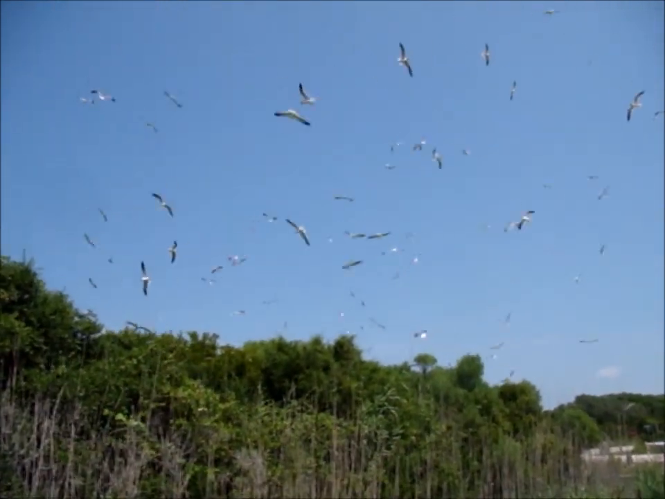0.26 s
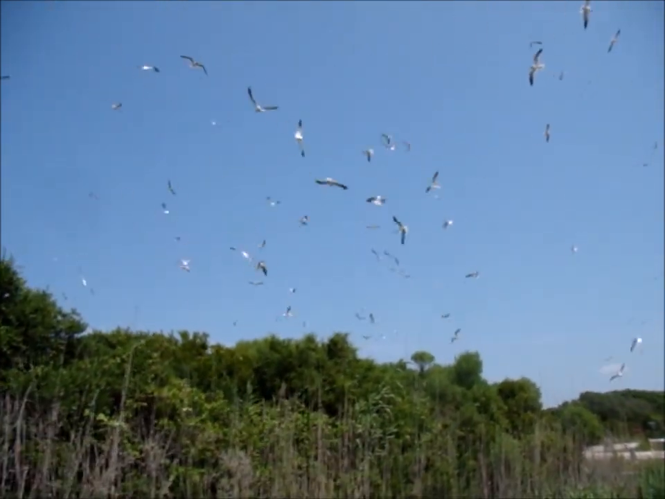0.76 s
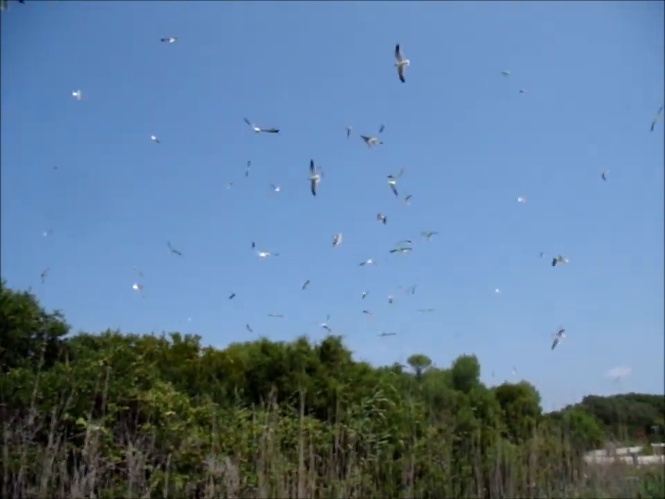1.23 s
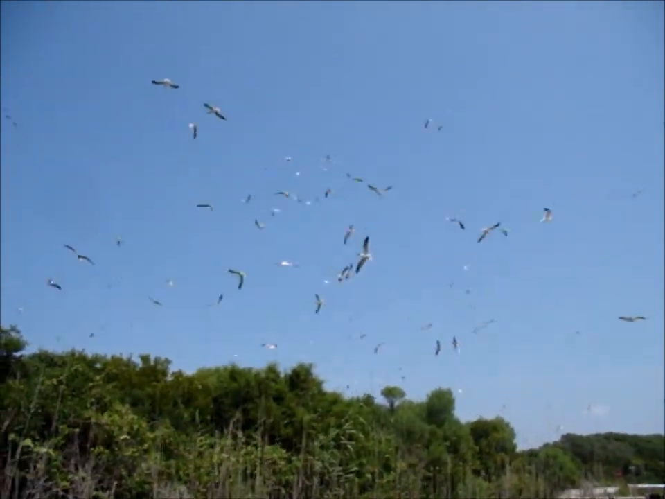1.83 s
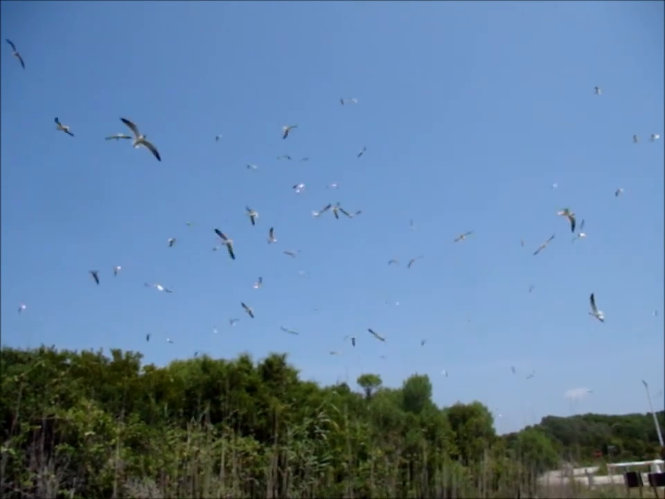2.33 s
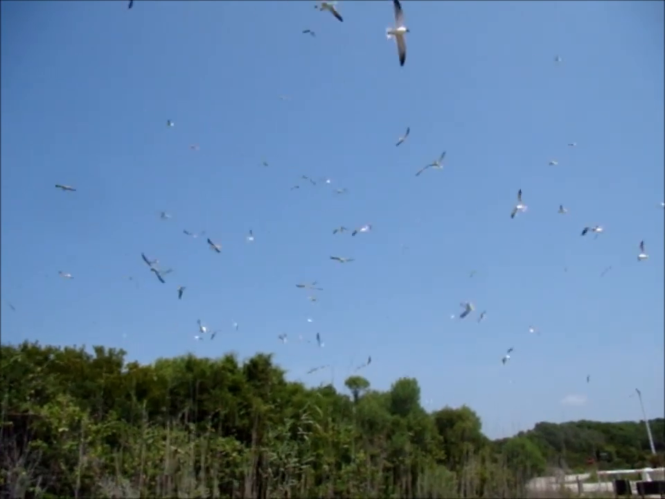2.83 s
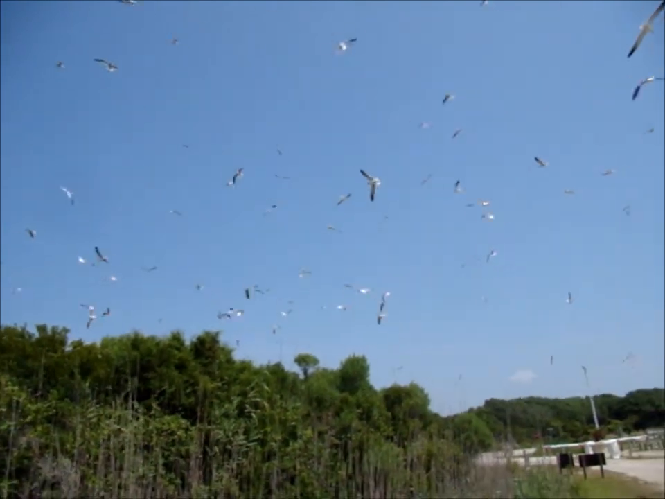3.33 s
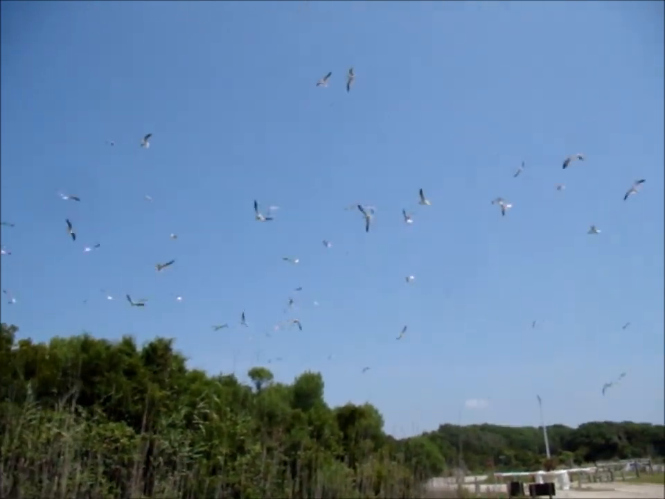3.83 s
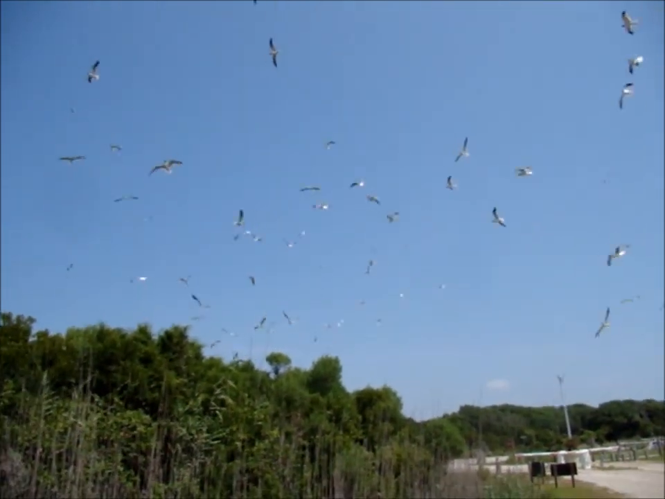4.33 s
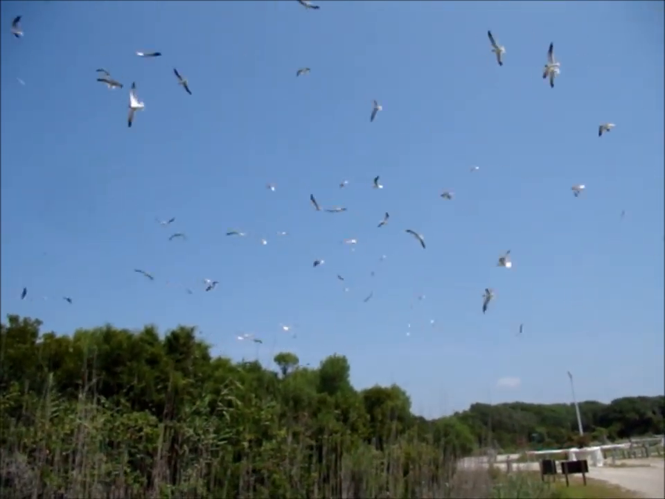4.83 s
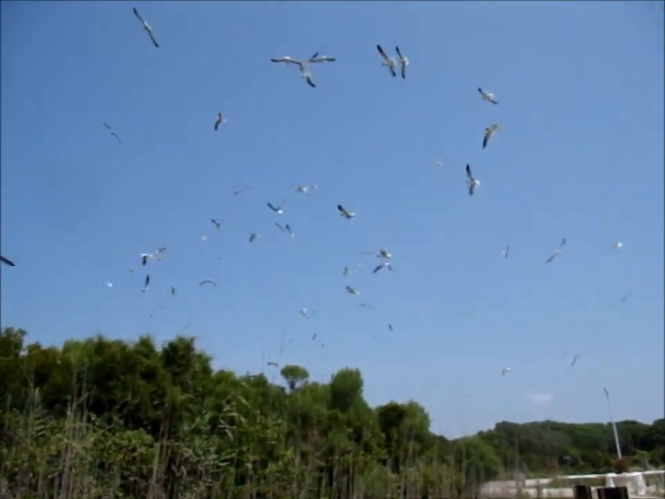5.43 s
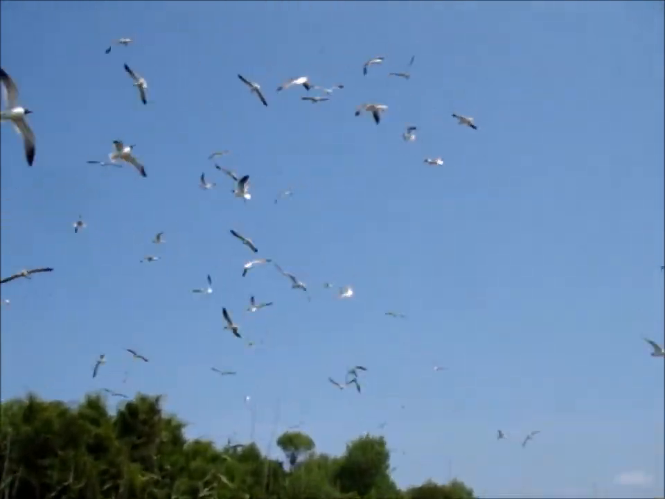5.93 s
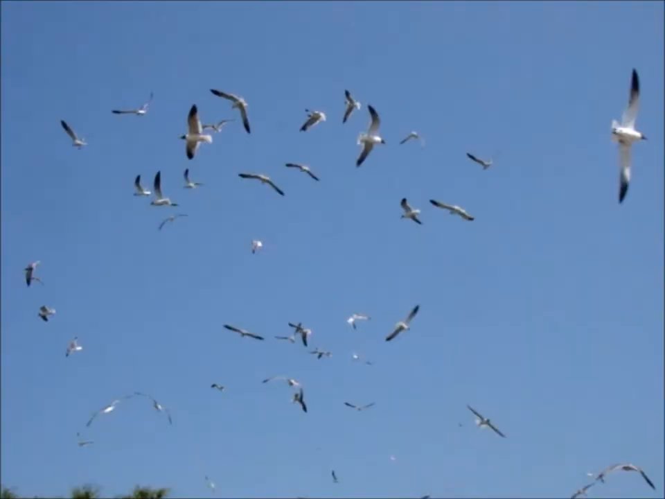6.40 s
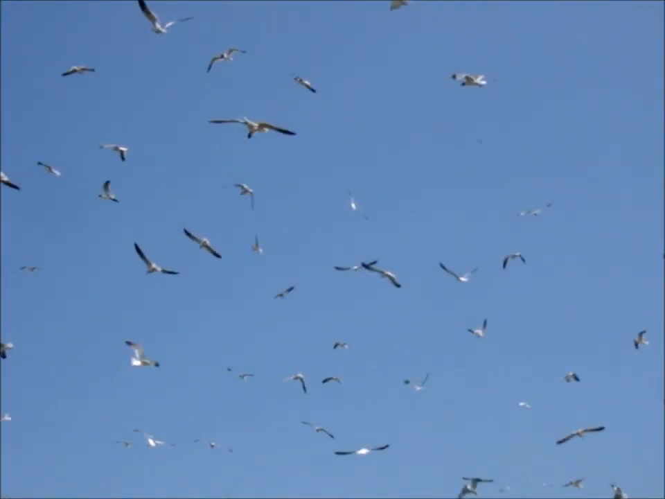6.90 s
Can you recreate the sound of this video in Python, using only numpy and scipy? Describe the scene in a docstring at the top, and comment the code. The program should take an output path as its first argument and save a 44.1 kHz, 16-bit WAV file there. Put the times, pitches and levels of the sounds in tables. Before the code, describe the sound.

A quiet, slightly wavering air rush runs throughout, with faint high insect chirps, a fading hiss and distant gull cries. At 0.14 s a small bird gives quick whistled pips and a soft trill until about 0.5 s. Near gulls then squawk in short, arched, nasal notes, with a longer cry at 0.9 s and a dense, loud, raspy tangle from 1.3 to 1.9 s. Soft low bumps fall at 0.8, 1.5 and 2.1 s. Three harsh cheks follow from 1.9 s. The flock thins; sharp hard clicks come at 2.4, 3.8 and 4.3 s. A thin insect shrill enters at 3 s, a pulsed buzz at 4.8 s, both ending near 6.3 s. Moderate gull calls gather from 3.5 s, loud ones burst at 5.2-5.5 s, and scattered squawks continue as the far flock swells until 7.1 s. Trees return a faint echo.

```python
"""Gulls over a marsh edge. From the start: filtered-noise air rush, far cries (harmonic sums), tree echoes
(delays and a noise tail), a narrow-noise insect chirper and a fading hiss. At 0.14 s sine pips and a trill;
from 0.3 s near gulls squawk over one another, pitch-gliding partials through throat and beak resonances.
Soft noise-puff bumps start at 0.8 s, harsh noise cheks at 1.9 s, sharp clicks (bursts ringing damped modes)
at 2.4 s; noise-band insects join: a shrill at 3 s, a pulsed buzz at 4.8 s."""
import sys
import numpy as np
from scipy import signal
from scipy.fft import rfft, irfft, next_fast_len
from scipy.io import wavfile
from scipy.ndimage import map_coordinates

SR = 44100
rng = np.random.default_rng(int(sys.argv[2]) if len(sys.argv) > 2 else 0)


def wav_record(signal):
    """Record a signal, one row per channel, as 16-bit PCM in the file named by sys.argv[1]."""
    frames = np.transpose(np.atleast_2d(signal))
    bounded = np.clip(frames, -1, 1)
    # unit amplitude maps onto the largest positive 16-bit level
    quanta = np.round(bounded * 32767).astype(np.int16)
    wavfile.write(sys.argv[1], SR, quanta)


N = 315756

# Gull throat response: f/Hz, level/dB
THROAT_RESPONSE = [(400, -27.5), (750, -11.5), (1050, -11), (1350, -7.5), (1900, -1.5), (2600, -2),
                   (3300, -4.5), (4050, -2), (4600, -9), (5250, -5), (5900, -13), (6600, -20.5),
                   (8500, -23), (11000, -55.5)]


def amp(db):
    """Decibels to gain."""
    return 10 ** (np.asarray(db) / 20)


def unit(x):
    """Scale to rms 1."""
    return x / np.sqrt(np.mean(x ** 2) + 1e-20)


def along(points, hz):
    """Interpolate (f/Hz, value) points on a log frequency axis."""
    f, v = np.transpose(points)
    return np.interp(np.log(hz + 1), np.log(f + 1), v)


def clock(size=N):
    """Time of each sample, s."""
    return np.arange(size) / SR


def level(rows):
    """Gain per sample from (t/s, level/dB) rows."""
    return amp(np.interp(clock(), *np.transpose(rows)))


def wobble(rate_hz, size=N):
    """Smooth random curve with rate_hz knots per second."""
    knots = rng.standard_normal(int(size * rate_hz / SR) + 4)
    return map_coordinates(knots, [clock(size) * rate_hz])


def filtered(x, response):
    """Apply a real gain response(f/Hz) by zero-padded FFT."""
    m = next_fast_len(N + SR // 2)
    return irfft(rfft(x, m) * response(np.fft.rfftfreq(m, 1 / SR)), m)[:N]


def noise(colour):
    """Noise of rms 1, spectrum from (f/Hz, level/dB) points."""
    return unit(filtered(rng.standard_normal(N), lambda hz: amp(along(colour, hz))))


def band(centre_hz, width_hz):
    """Noise of rms 1 in one steep resonance."""
    return unit(filtered(rng.standard_normal(N), lambda hz: 1 / (1 + ((hz - centre_hz) / width_hz) ** 4)))


def add(track, s, sound):
    """Mix a sound into the track at time s."""
    start = int(np.clip(round(s * SR), 0, N))
    track[start:start + len(sound)] += sound[:N - start]


def air(air_db=-41.5, swell_db=-48, swell_s=4.24, swell_length_s=1.0, sizzle_db=-55, sizzle_hz=7900):
    """Slightly wavering broadband rush and a high sizzle; the low middle swells once."""
    # Rush spectrum: f/Hz, density/dB per Hz
    rush_colour = [(15, -54), (25, -18), (135, -11), (207, -4.5), (917, 0), (1180, 1), (1560, -9),
                   (2000, -10), (2780, -14), (3320, -15.5), (4370, -12.5), (5090, -17.5), (5920, -15),
                   (9550, -8.5), (10300, -62), (13400, -59), (22000, -120)]
    swell_colour = [(120, -41), (230, -11), (450, 10.5), (1200, -14.5), (2000, -51.5)]  # f/Hz, level/dB
    rush = noise(rush_colour) * amp(air_db + wobble(3) / 4)
    sizzle = amp(sizzle_db) * band(sizzle_hz, 1100)
    swell = amp(swell_db) * np.exp(-((clock() - swell_s) / swell_length_s) ** 2)
    return rush + sizzle + swell * noise(swell_colour)


def spell(start_s, end_s, db, fade_s=0.2):
    """Gain of an insect that swells, holds and fades."""
    t = clock()
    return amp(db) * np.clip(np.minimum(t - start_s, end_s - t) / fade_s, 0, 1)


def insects(chirp_db=-55, hiss_db=-53, hiss_hz=5200, hiss_fade_s=4, chirp_rate_hz=6.3, buzz_rate_hz=73):
    """Narrow noise bands: fading hiss, gated high chirps, steady shrill, pulsed buzz."""
    # One spell each: start/s, end/s, level/dB
    shrill_spell = (2.98, 6.3, -50)
    buzz_spell = (4.8, 6.35, -46.5)
    t = clock()
    hiss = amp(hiss_db) * np.exp(-t / hiss_fade_s) * band(hiss_hz, 280)
    gate = np.maximum(np.cos(2 * np.pi * chirp_rate_hz * t + .5 * wobble(1.5)), 0)
    chirps = amp(chirp_db) * unit(band(9786, 190) * gate)
    shrill = band(9166, 140) * spell(*shrill_spell)
    beat = 2 * np.pi * buzz_rate_hz * t
    pulses = (1 + .8 * np.sin(beat)) * (1 + .3 * np.sin(beat / 3))
    buzz = unit(band(4060, 280) * pulses) * spell(*buzz_spell)
    return hiss + chirps + shrill + buzz


def note(length_s, rise_s, crest_hz, scoop, sag, drop, db, change_db):
    """Pitch and gain climb to a crest and fall at the close; long notes swing to a second, lower crest."""
    onset_db, release_db, edge_s = -8.5, -12, 0.0028
    two_crest_s = .172  # longer notes dip and lift again
    dip_share, swing_share, settle_share = .42, .35, .38  # of the time after the crest
    close_share, close_curve = .28, 1.7  # share of the whole note; how late the drop steepens
    t = clock(int(length_s * SR))
    opening = np.maximum(1 - t / rise_s, 0) ** 2
    held = np.maximum(t - rise_s, 0) / max(length_s - rise_s, edge_s)
    if length_s > two_crest_s:
        settled = 1 - np.exp(-(held / swing_share) ** 2) * np.cos(np.pi * held / dip_share)
    else:
        settled = 1 - np.exp(-(held / settle_share) ** 2)
    closing = np.maximum(1 - (1 - t / length_s) / close_share, 0) ** close_curve
    pitch = crest_hz * (1 - scoop * opening) * (1 - sag * settled) * (1 - drop * closing)
    ends = np.clip(np.minimum(t, length_s - t) / edge_s, 0, 1)
    gain = ends * amp(db + onset_db * opening + change_db * held + release_db * closing ** 2)
    return pitch, gain


def syrinx(pitch, rasp):
    """Phase and strength of the membranes; raspy ones turn hoarser where the pitch slides fast."""
    size = len(pitch)
    slide = abs(np.gradient(np.log(pitch))) * SR  # 1/s
    hoarse = np.sqrt(np.clip(rasp * (1 + .028 * slide ** 2), 0, .9))
    phase = 2 * np.pi * np.cumsum(pitch * (1 + .0055 * wobble(80, size))) / SR
    phase += .19 * hoarse * wobble(400, size)
    strength = amp(1.3 * wobble(70, size)) * (1 + .35 * hoarse * wobble(400, size))
    return phase, strength


def cry(pitch, gain, beak_hz, beak_db, treble_db, rasp, count=12, beak_width=0.19, beak_fall=0.099, drift_db=3):
    """The syrinx buzzes through throat and beak; the beak closes along the cry, and effort brightens it."""
    size = len(pitch)
    phase, strength = syrinx(pitch, rasp)
    k = np.arange(1, count + 1)[:, None]
    hz = k * pitch
    centre_hz = beak_hz * np.exp(beak_fall * np.linspace(1, -1, size))
    beak = beak_db * np.exp(-np.log(hz / centre_hz) ** 2 / (2 * beak_width ** 2))
    effort_db = 5 * np.log10(gain / gain.max() + .1)
    treble = (treble_db + effort_db) * np.clip(np.log2(hz / 2400), 0, 1)
    knots_s = np.arange(24) / 45
    drift = np.array([np.interp(clock(size), knots_s, row) for row in rng.standard_normal((count, 24))])
    flicker = drift_db * np.sqrt(k / 4) * drift  # strongest in the upper partials
    partials = amp(along(THROAT_RESPONSE, hz) + beak + treble + flicker)
    partials /= np.sqrt(np.sum(partials ** 2, axis=0) / 2)
    waves = np.sin(k * phase + .5 * k ** 2)  # the throat spreads each pulse in time
    return gain * strength * np.sum(partials * waves, axis=0)


def far_gulls(count=52, pitch_hz=780, length_s=0.27, treble_db=-9, rise_s=.06, scoop=.22, sag=.06, drop=0.18):
    """Many distant arched cries, dulled by the air, at random pitch, length and level."""
    # Level of the far flock: t/s, level/dB
    flock_level = [(0, -44.5), (.8, -45.5), (2, -58), (3.3, -72), (4.2, -64), (5.6, -57), (6.5, -49.5),
                   (7.1, -43.5)]
    out = np.zeros(N)
    for i, (when, high, long, loud) in enumerate(rng.uniform(-1, 1, (count, 4))):
        pitch, gain = note(length_s * np.exp(.4 * long), rise_s, pitch_hz * np.exp(.27 * high),
                           scoop, sag, drop, 3 * loud, -1)
        start_s = (i + when / 2) * N / SR / count
        add(out, start_s, cry(pitch, gain, beak_hz=1340, beak_db=0.5, treble_db=treble_db, rasp=0.37, count=6))
    return unit(out) * level(flock_level)


def trees(x, wet_db=-22, echo_db=-31, echo_s=0.19, ground_db=-20, ground_s=.007):
    """The ground answers almost at once, the tree line later; foliage scatters a decaying tail."""
    # Tail decay: f/Hz, t60/s
    decay = [(300, 0.17), (2000, 0.9), (5000, 0.64), (10000, 0.034)]
    hz, t, z = signal.stft(rng.standard_normal(SR * 3 // 4), SR, nperseg=256)
    tail = signal.istft(z * amp(-60 * t / along(decay, hz)[:, None]), SR, nperseg=256)[1]
    scatter = signal.fftconvolve(x, tail / np.linalg.norm(tail))[:N]
    late = lambda s: np.pad(x, (int(s * SR), 0))[:N]
    return amp(wet_db) * scatter + amp(echo_db) * late(echo_s) + amp(ground_db) * late(ground_s)


def small_birds(trill_rate_hz=41, trill_hz=2720, upper_hz=3190, trill_db=-39, upper_db=-4, droop_hz=35):
    """Gliding sine pips, a quick trill of two alternating sine voices, and harsh noise cheks."""
    # Whistled pips: start/s, length/s, first pitch/Hz, last pitch/Hz, level/dB
    pips = [(.142, 0.012, 2220, 2380, -30), (0.159, 0.048, 3300, 3436, -30),
            (0.203, 0.049, 2600, 2060, -34)]
    # Harsh notes: t/s, level/dB
    cheks = [(1.908, -29), (2.037, -30.5), (2.196, -32), (3.955, -39)]
    # Chek spectrum: f/Hz, level/dB
    chek_colour = [(1500, -24.5), (2700, -15), (3500, -4), (4200, -6.5), (5200, -27), (9000, -41)]
    out, t = np.zeros(N), clock()
    whistle = lambda pitch: np.sqrt(2) * np.sin(2 * np.pi * np.cumsum(pitch) / SR)
    for s, length_s, first_hz, last_hz, db in pips:
        size = int(length_s * SR)
        add(out, s, amp(db) * np.hanning(size) * whistle(np.linspace(first_hz, last_hz, size)))
    beat = 2 * np.pi * trill_rate_hz * t + 0.56 * wobble(8.5)
    trill_fade = np.interp(t, [.19, .24, .45, .49], [0, 1, 1, 0])
    for hz, db, turn in [(trill_hz, 0, 0), (upper_hz, upper_db, np.pi)]:  # upper voice half a beat away
        gate = np.clip(.5 + np.cos(beat + turn), 0, 1) * trill_fade
        pitch = hz - droop_hz * np.sin(beat + turn) + 18 * wobble(340)
        out += amp(trill_db + db) * gate * whistle(pitch)
    harsh = noise(chek_colour)
    for s, db in cheks:
        u = np.maximum(t - s, 0) / 0.014  # peaks 14 ms after its start
        out += amp(db) * u * np.exp(1 - u) * harsh
    return out


def near_gulls(rush_db=-12):
    """Overlapping near cries; air rushing through a raspy throat hisses between the partials."""
    # Notes: start/s, length/s, rise to crest/s, crest pitch/Hz, opening scoop/0-1, sag after crest/0-1,
    # closing drop/0-1, crest level/dB, change to end/dB, mid-cry beak resonance/Hz, its height/dB,
    # treble/dB, rasp/0-1
    gull_notes = [(0.32, 0.096, 0.039, 970, 0.4, 0, 0.3, -42.5, -1, 2111, 10, 7, 0),
                  (0.469, 0.087, 0.022, 1060, 0.3, 0.12, 0.18, -27, -1, 2550, 5.5, 0.5, 0.28),
                  (0.557, 0.14, 0.029, 883, 0.2, 0.01, 0.15, -30, -1.5, 2500, 5.5, 0.5, 0.22),
                  (0.6, 0.13, 0.033, 723, 0.14, 0.13, 0.22, -35.5, 6.5, 1960, 8.5, -4, 0.7),
                  (0.713, 0.11, 0.033, 628, 0.19, 0.05, 0, -31, -10, 1690, 3.5, -9, 1),
                  (0.768, 0.095, 0.056, 876, 0.5, 0.1, 0.54, -37, 0.5, 1540, 12, -14, 0.9),
                  (0.919, 0.25, 0.045, 725.3, 0.24, 0.095, 0.11, -23, -0.5, 2260, 9, -2, 0.17),
                  (0.957, 0.07, 0.0162, 1067, 0.15, 0.12, 0.1, -34, -2, 4100, 9, -3, 0.2),
                  (1.027, 0.15, 0.065, 999, 0.33, 0, 0.24, -28, -13, 4000, 6, -4, 0),
                  (1.334, 0.077, 0.043, 901, 0.27, 0.01, 0, -25, -18, 2590, 11, -2, 0.2),
                  (1.375, 0.04, 0.02, 990, 0.27, 0.02, 0.06, -28, -3, 3520, 3, -9, 0),
                  (1.402, 0.076, 0.069, 870, 0.08, 0.1, 0.02, -33, -0.5, 1750, 4.5, -2, 0.1),
                  (1.468, 0.083, 0.039, 1027, 0.2, 0.08, 0.16, -26.5, -2, 2592, 4, -2, 0.1),
                  (1.547, 0.057, 0.025, 787, 0.04, 0.06, 0.37, -29, 3, 2500, 11, 2.5, 0),
                  (1.56, 0.048, 0.023, 968, 0.01, 0.07, 0.03, -35.5, 8.0, 3279, 14, -3, 0.2),
                  (1.598, 0.059, 0.012, 822, 0.26, 0.07, 0.14, -26, -2, 2410, 15, 0, 0.3),
                  (1.645, 0.058, 0.015, 754, 0.12, 0.01, 0.2, -25.5, 2, 2300, 11, -3, 0.6),
                  (1.666, 0.086, 0.035, 1084, 0.4, 0.09, 0.11, -17.5, -10, 4070, 4, -2, 0.3),
                  (1.669, 0.092, 0.025, 959, 0.3, 0.08, 0.3, -25, -4, 1770, 5.5, -3, 0.8),
                  (1.748, 0.168, 0.0096, 791, 0.32, 0.11, 0.42, -29, 0.5, 1960, 9.5, -1.5, 0.23),
                  (1.762, 0.086, 0.013, 882, 0.13, 0.01, 0.02, -24, 1.5, 5000, -5.5, 12.5, 0),
                  (1.82, 0.092, 0.042, 978, 0.13, 0.05, 0.3, -21, -6.5, 3160, 2, 4.5, 0.1),
                  (1.95, 0.13, 0.03, 965, 0.02, 0, 0.36, -40.5, -4, 1384, 18, 0, 0.02),
                  (2.534, 0.1, 0.056, 715, 0.25, 0, 0, -39.5, 2, 2811, 13, -13, 0.4),
                  (2.61, 0.14, 0.05, 750, 0.02, 0.08, 0.32, -35.5, 1, 2660, 13, -12, 0.2),
                  (2.726, 0.13, 0.02, 600, 0.2, 0.06, 0.2, -44, -6.5, 1770, 8, -6, 0.9),
                  (2.944, 0.086, 0.046, 739, 0.06, 0.02, 0, -43.5, -2, 2160, 13, -35, 0.2),
                  (3.009, 0.12, 0.046, 721, 0.28, 0.12, 0.12, -37, -7, 1220, 20, -31, 0),
                  (3.517, 0.13, 0.044, 782, 0.3, 0.17, 0.5, -30.5, -8, 2540, 15.5, 4, 0.5),
                  (3.64, 0.075, 0.026, 1019, 0.3, 0.18, 0.14, -32.5, -4, 2041, 1, -13, 0.16),
                  (3.678, 0.1, 0.037, 798, 0.3, 0.17, 0.2, -32, -1, 2474, 10, -8, 0.24),
                  (3.793, 0.11, 0.055, 904, 0.12, 0.06, 0.06, -31.5, -4, 1800, 1, -18, 0.4),
                  (3.825, 0.22, 0.038, 922, 0.1, 0.145, 0.32, -31.5, -4.5, 2500, 4.5, 6, 0.5),
                  (3.9, 0.16, 0.04, 927, 0.13, 0.07, 0.3, -35, -3.5, 2600, 6.5, 0, 0.7),
                  (4.394, 0.25, 0.033, 784, 0.32, 0.04, 0.12, -37, -5.5, 1920, 6, -16, 0.6),
                  (4.653, 0.12, 0.04, 799, 0.5, 0.05, 0, -38, -0.5, 2930, 9, -15, 0.3),
                  (4.644, 0.086, 0.015, 1000, 0.26, 0.06, 0.1, -47, -9, 1885, 15, -16, 0.15),
                  (4.76, 0.13, 0.029, 1014, 0.48, 0.01, 0.12, -32, -2, 1800, 8, -6, 0.17),
                  (4.806, 0.078, 0.026, 648, 0.35, 0.1, 0.3, -31.5, -9, 2120, 11, -11, 0.5),
                  (4.874, 0.19, 0.034, 831, 0.4, 0.07, 0.4, -29, -10, 2800, 12, -8, 0.27),
                  (5.201, 0.078, 0.045, 852, 0.48, 0.04, 0.02, -22.5, 4, 2300, 7, -5, 0.34),
                  (5.273, 0.15, 0.013, 1048, 0.24, 0.05, 0.12, -18, 1, 2130, 7.5, 0.5, 0.07),
                  (5.296, 0.1, 0.053, 675.4, 0.25, 0.11, 0.02, -21, -8.5, 2450, 11.5, 3, 0.13),
                  (5.381, 0.14, 0.01, 620, 0.03, 0.05, 0.05, -23.5, -7.5, 1770, 8.5, 0, 0.2),
                  (5.591, 0.091, 0.035, 979, 0.06, 0.12, 0.36, -39, -0.5, 1580, 3, -10, 0.22),
                  (5.691, 0.17, 0.066, 835, 0.25, 0.01, 0.16, -39.5, -4, 1510, 17, -12, 0.06),
                  (5.946, 0.057, 0.023, 1115, 0.23, 0.12, 0.05, -30.5, -2, 1900, 2.5, -3, 0.3),
                  (5.988, 0.12, 0.031, 670, 0.32, 0.02, 0.1, -36.5, -13, 4480, 18, -22.5, 0.5),
                  (6.059, 0.13, 0.058, 1018, 0.27, 0.01, 0.3, -32.5, -5, 4200, 19, -19, 0.04),
                  (6.138, 0.088, 0.022, 828, 0.24, 0.04, 0.27, -30, -6, 2720, 10, -1, 0.35),
                  (6.197, 0.12, 0.054, 831, 0.24, 0, 0.33, -28.5, -1, 2410, 11, -8.5, 0.3),
                  (6.293, 0.099, 0.039, 903, 0.43, 0.23, 0.16, -37, -6, 1514, 2, -23, 0.3),
                  (6.438, 0.11, 0.08, 1105, 0.12, 0.13, 0.06, -48.5, -2, 3300, 12, -10, 0.1),
                  (6.633, 0.078, 0.029, 710, 0.25, 0.03, 0.14, -34, 2, 1944, 10.5, -1, 0.5),
                  (6.677, 0.19, 0.05, 791.6, 0.35, 0.055, 0.36, -24.5, -4.5, 1775, 13.5, -1.5, 0.33),
                  (6.959, 0.072, 0.033, 735, 0.23, 0.14, 0.04, -29, -0.5, 2510, 7, -2, 0.2),
                  (7.012, 0.058, 0.034, 829, 0.37, 0.2, 0.1, -28.5, -6, 2030, 11, -14, 0.55),
                  (7.014, 0.168, 0.028, 733, 0.25, 0.06, 0.01, -25.5, 3, 2450, 15, -1, 0.13)]
    out, rush_power = np.zeros(N), np.zeros(N)
    for (s, length_s, rise_s, crest_hz, scoop, sag, drop, db, change_db,
         beak_hz, beak_db, treble_db, rasp) in gull_notes:
        pitch, gain = note(length_s, rise_s, crest_hz, scoop, sag, drop, db, change_db)
        add(out, s, cry(pitch, gain, beak_hz, beak_db, treble_db, rasp))
        add(rush_power, s, abs(rasp) * gain ** 2)
    return out + amp(rush_db) * np.sqrt(rush_power) * noise(THROAT_RESPONSE)


def bumps(width_octaves=1.6):
    """Brief soft puffs and knocks: Gaussian noise bursts, each around its own frequency."""
    # Bumps: centre t/s, level/dB, half length/s, centre f/Hz
    bump_rows = [(0.765, -40.5, 0.045, 125), (1.496, -36, 0.011, 400), (1.663, -44, 0.034, 179),
                 (2.142, -47.5, 0.055, 148), (3.892, -34, 0.0075, 380), (3.97, -49, 0.098, 160),
                 (4.875, -37, .006, 950), (6.218, -40, 0.0094, 750)]
    t, out = clock(), np.zeros(N)
    for s, db, half_s, centre_hz in bump_rows:
        bell = lambda hz: np.exp(-(np.log2((hz + 1) / centre_hz) / width_octaves) ** 2)
        puff = filtered(rng.standard_normal(N), bell)
        out += amp(db) * np.exp(-((t - s) / half_s) ** 2) * unit(puff)
    return out


def clicks(ring_db=17, crack_s=0.0036, crack_db=-3, scuff_s=0.047, scuff_hz=850, scuff_width_hz=600):
    """A tiny burst of contacts rings a hard, well damped body; a dull scuff trails each one."""
    # Clicks: t/s, level before ring_db/dB, treble/dB (modes above 3 kHz), scuff level/dB
    click_rows = [(2.367, -14, -6, -39.5), (3.7733, -14, -1, -41), (3.781, -21.5, 4, -52),
                  (3.8254, -9.5, 0.5, -46), (4.279, -23, -22, -38.5), (4.3045, -13.5, -5, -39.5)]
    # Body modes: f/Hz, width/Hz, level/dB
    modes = [(1210, 280, 7), (1720, 190, 2.5), (4030, 460, 5.5), (6900, 420, -7.5)]
    out, t = np.zeros(N), clock(SR // 4)
    scuff = band(scuff_hz, scuff_width_hz)
    for s, db, treble_db, scuff_db in click_rows:
        burst = rng.standard_normal(len(t)) * np.exp(-t / crack_s)
        burst = amp(crack_db) * burst / np.linalg.norm(burst)
        burst[0] += 1  # first contact
        body = np.zeros(len(t))
        for hz, width_hz, mode_db in modes:
            gain = amp(mode_db + treble_db * (hz > 3000)) * 2 * np.pi * width_hz / SR
            body += gain * np.exp(-np.pi * width_hz * t) * np.cos(2 * np.pi * hz * t)
        add(out, s, amp(db + ring_db) * signal.fftconvolve(burst, body)[:len(t)])
        add(out, s, amp(scuff_db) * np.exp(-t / scuff_s) * scuff[int(s * SR):][:len(t)])
    return out


def scene():
    """Sum all sources; only the birds are echoed."""
    birds = far_gulls() + small_birds() + near_gulls()
    return (air() + insects() + birds + trees(birds) + bumps() + clicks())[None]


def record(dry, top_hz=10150):
    """Very steep low-pass at the band limit."""
    return filtered(dry[0], lambda hz: 1 / np.sqrt(1 + np.minimum(hz / top_hz, 2) ** 200))[None]


dry = scene()
out = record(dry)
wav_record(out)
```